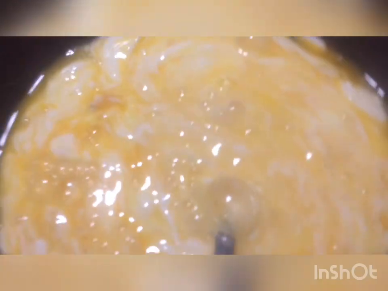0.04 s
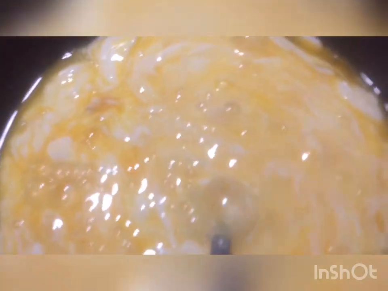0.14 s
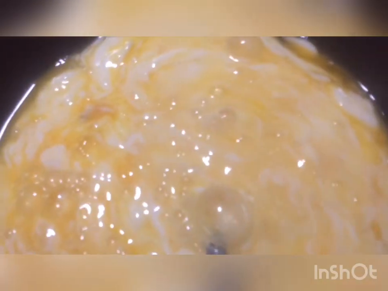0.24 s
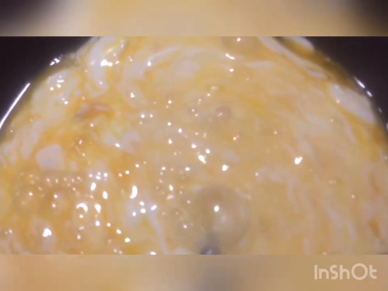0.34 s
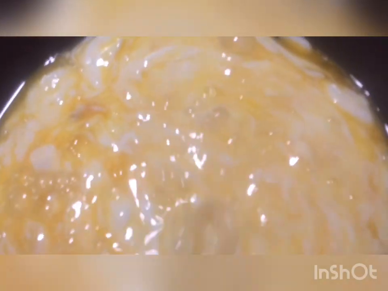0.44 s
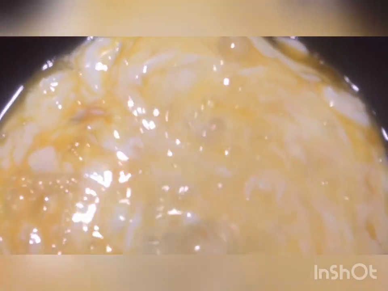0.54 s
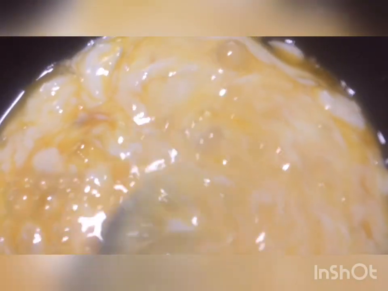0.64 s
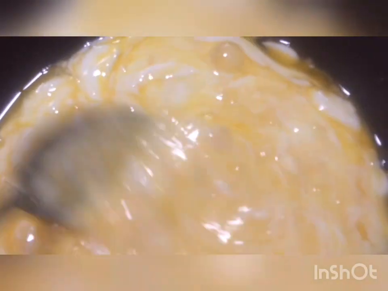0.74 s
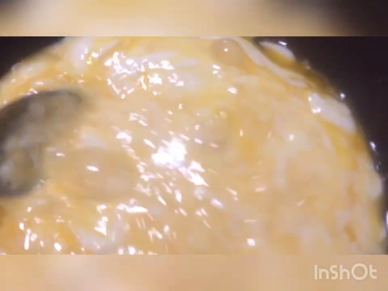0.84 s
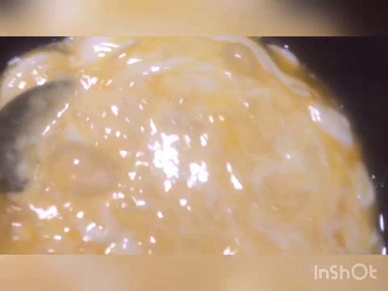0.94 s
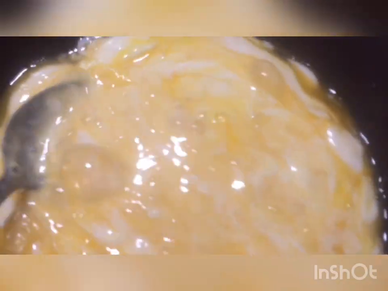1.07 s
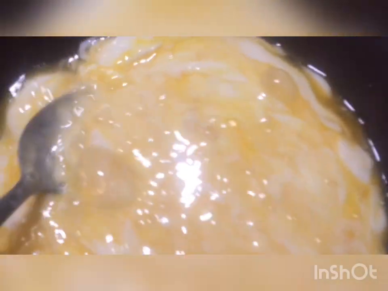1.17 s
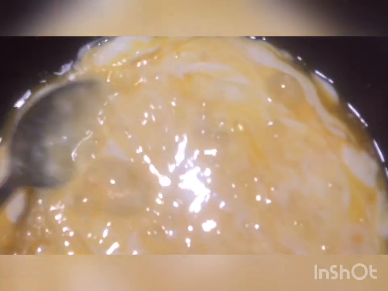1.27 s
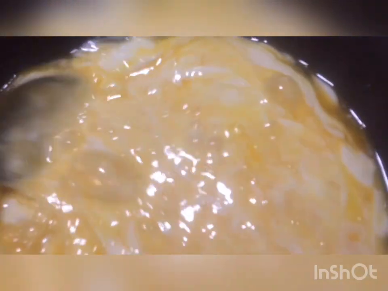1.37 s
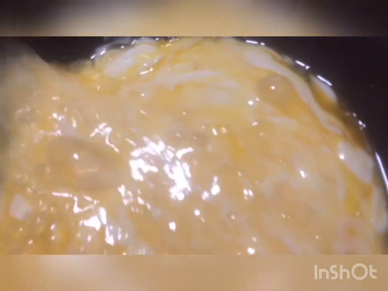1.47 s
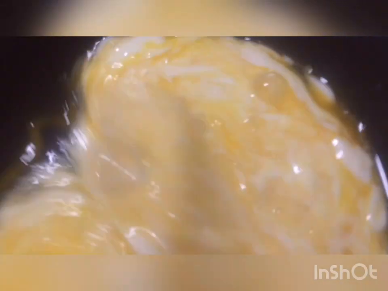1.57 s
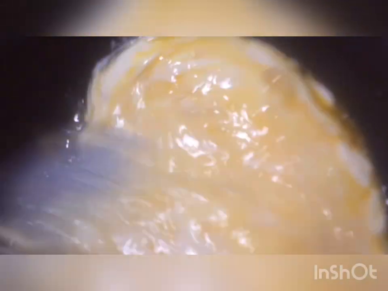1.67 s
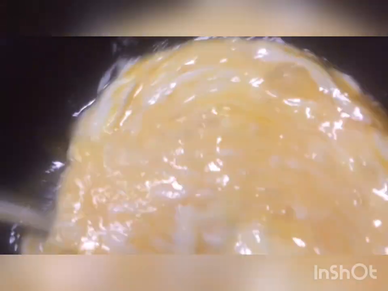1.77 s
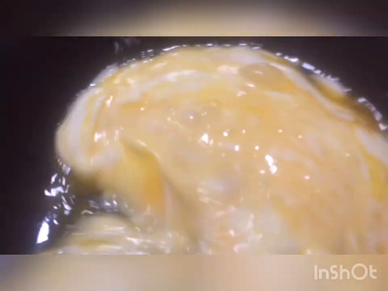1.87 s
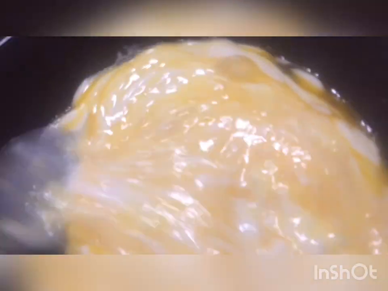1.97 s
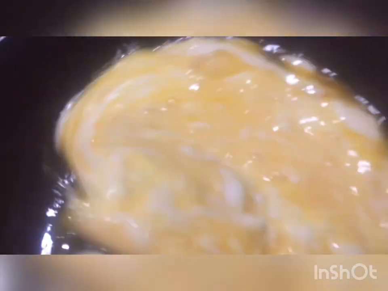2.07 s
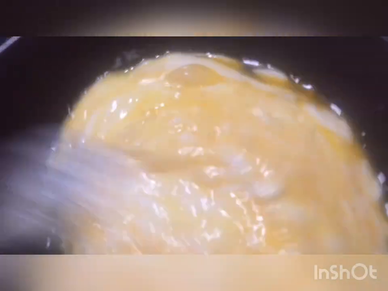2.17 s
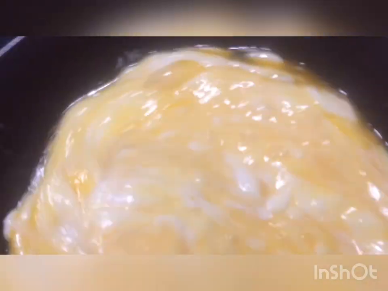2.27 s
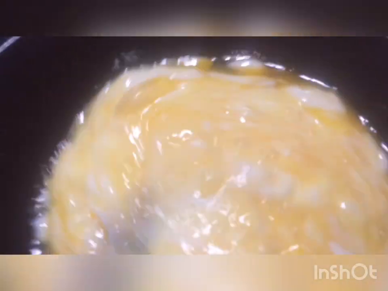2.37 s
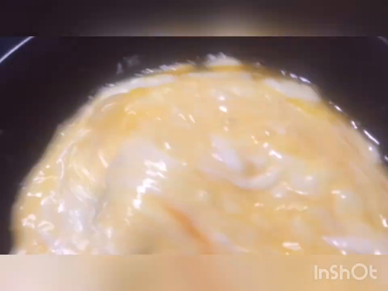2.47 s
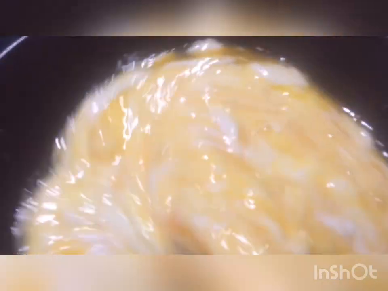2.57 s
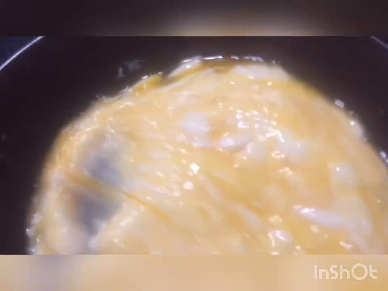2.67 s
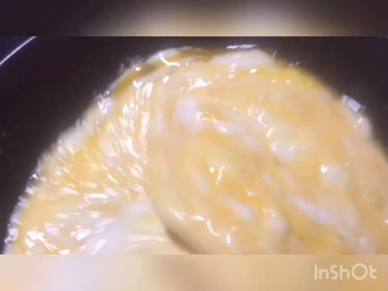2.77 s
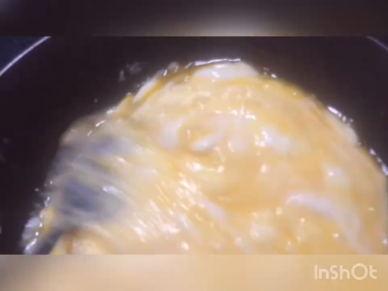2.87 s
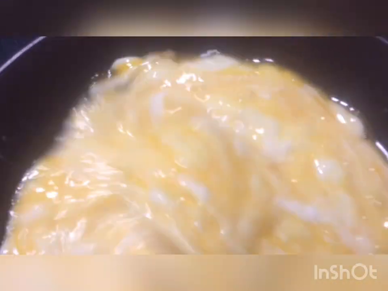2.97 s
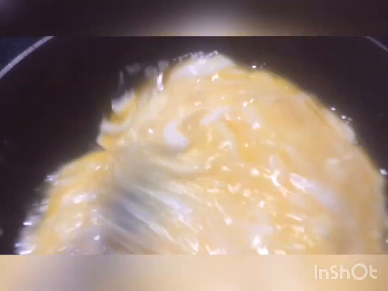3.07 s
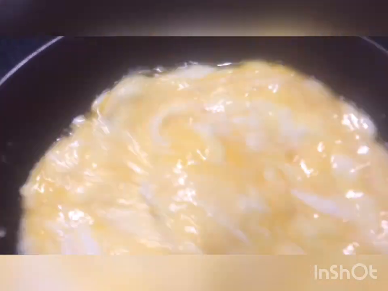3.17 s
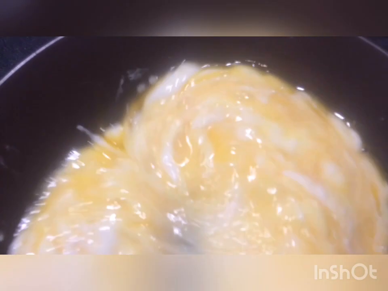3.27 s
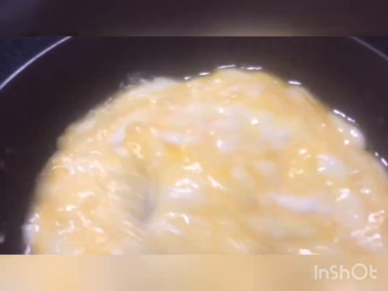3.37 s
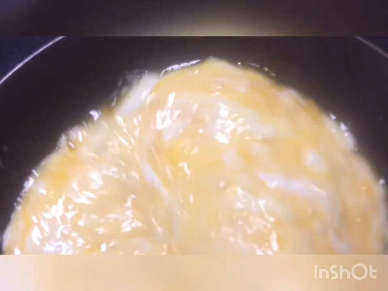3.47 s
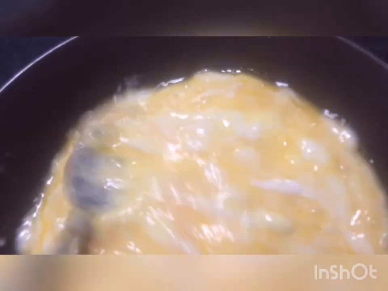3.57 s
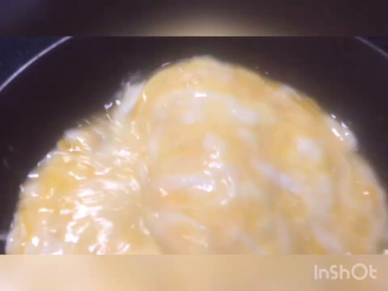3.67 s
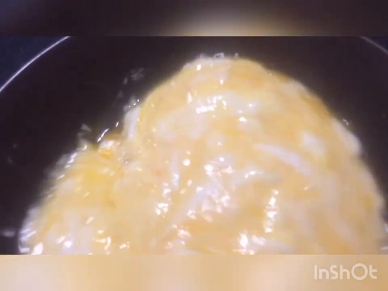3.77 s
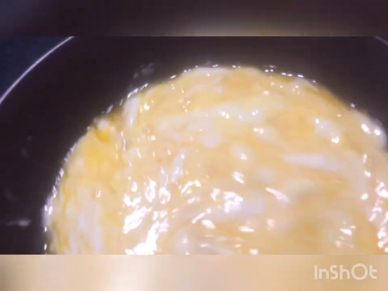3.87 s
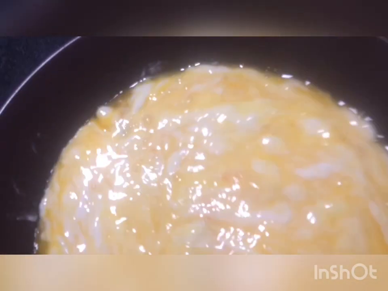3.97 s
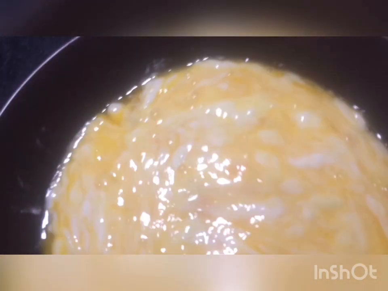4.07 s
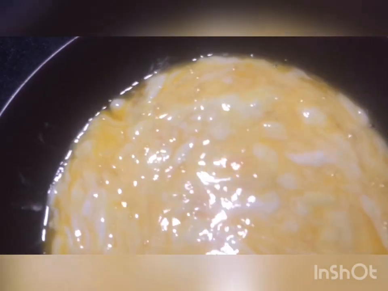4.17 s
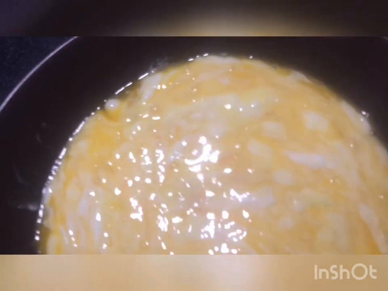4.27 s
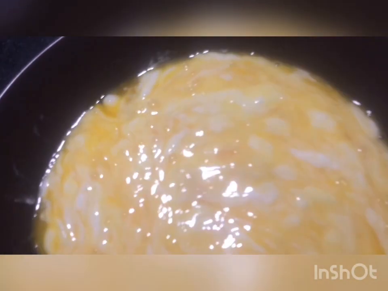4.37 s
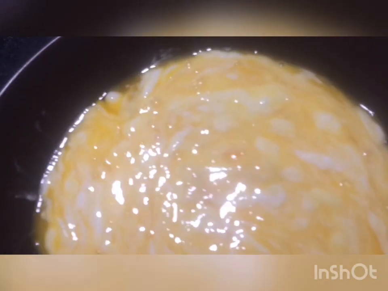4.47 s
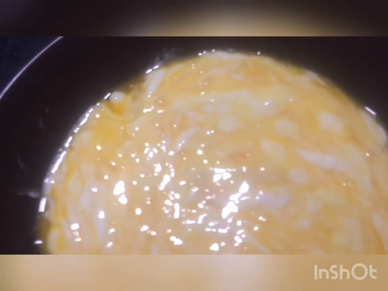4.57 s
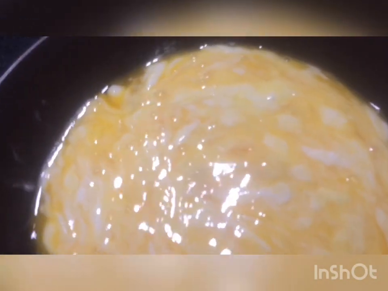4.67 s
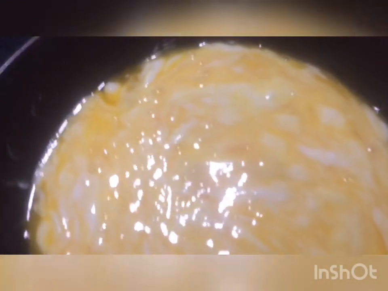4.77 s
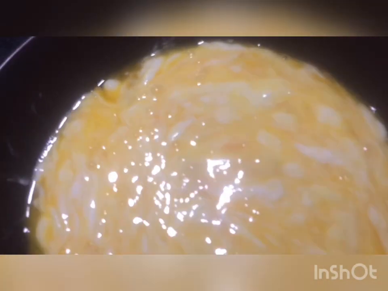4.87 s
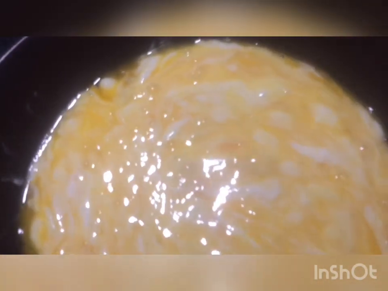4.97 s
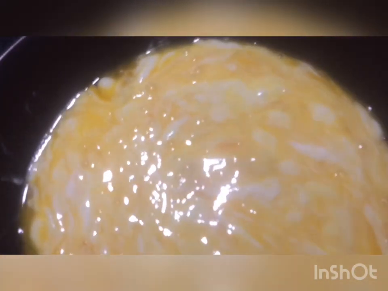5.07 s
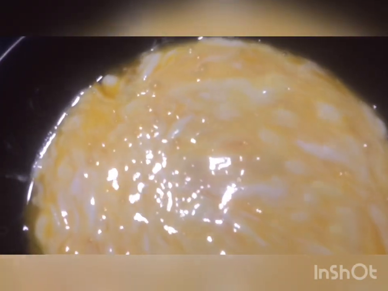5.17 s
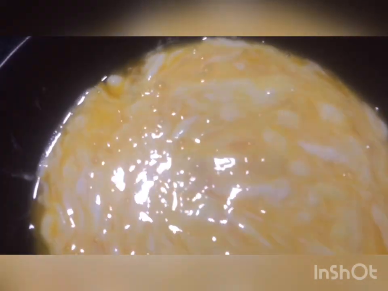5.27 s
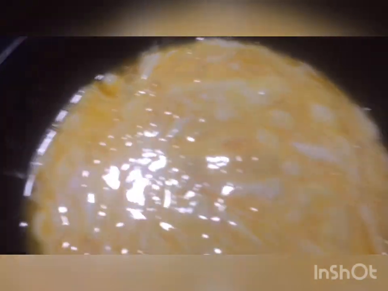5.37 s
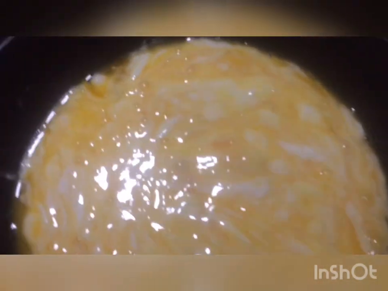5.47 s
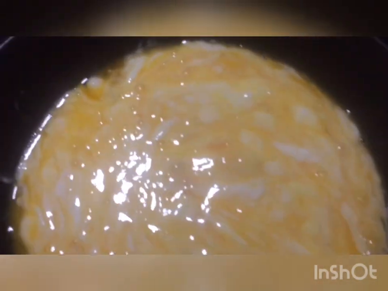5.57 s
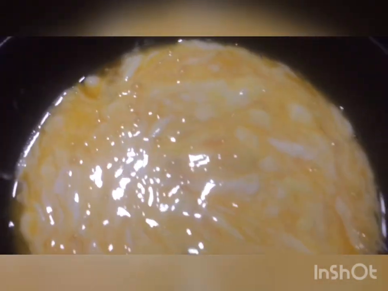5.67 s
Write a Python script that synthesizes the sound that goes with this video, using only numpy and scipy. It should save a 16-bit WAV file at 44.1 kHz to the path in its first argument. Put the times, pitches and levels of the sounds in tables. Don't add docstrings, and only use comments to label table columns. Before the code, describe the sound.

A few soft scraping strokes on a pan floor lead into about two seconds of rapid egg beating, each stroke a clink and gritty scrape with gloopy pops and slaps. The spoon is let go and clatters brightly on the counter; after a quiet second the pan is put down. Close microphone, short kitchen echo, light hiss.

```python
import sys
import numpy as np
from scipy import signal
from scipy.fft import rfft, irfft, next_fast_len
from scipy.io import wavfile

SR = 44100
rng = np.random.default_rng(int(sys.argv[2]) if len(sys.argv) > 2 else 0)


def nominal_scale(level):
    x = np.asarray(level, float) / 20
    return 10 ** x


def persist_wave(psi):
    counts = np.round(np.clip(psi, -1, 1) * 32767).astype(np.int16)
    wavfile.write(sys.argv[1], SR, np.atleast_2d(counts).T)


N = 253134
BEATING = round(4.1 * SR)

# [f/Hz, level/dB per Hz]
AIR_SPECTRUM = [(15, -38), (25, -18), (53, -5.5), (127, -8.5), (161, -4), (217, -18), (354, -2),
                (439, -19.5), (624, -15.5), (677, -20), (1480, -8), (2840, -27.5), (4250, -20.5),
                (10400, -31), (16000, -60)]
# [t/s, level/dB]
AIR_LEVEL = [(0, -61), (1.5, -59), (4.101, -59), (4.42, -62), (4.701, -60), (5.74, -59.5)]
# [f/Hz, width/Hz, level/dB]
CASING = [(142, 28, 1.5), (378, 41, -6.5), (586, 13, -9), (1320, 2.6, 8.5), (1542, 21, 2.5),
          (2060, 100, -17), (2350, 64, -13), (3560, 140, -12.5), (4030, 89, -13), (7140, 200, -17.5),
          (8600, 62, -25.5), (10000, 54, -28)]
# [f/Hz, width/Hz, level/dB]
MOTOR = [(158, 3.8, -69.5), (646, 6.6, -71.5)]
KITCHEN_T60_S, KITCHEN_DB, WALL_CUT_HZ = 0.33, -28.5, 8200

# [t/s, level/dB]
SET_DOWN = [
    (5.722, -51.5),
    (5.727, -45.5),
    (5.7325, -19.5),
    (5.7345, -24.5),
    (5.7375, -13.5),
    (5.7393, -22),
]
# [f/Hz, level/dB, t60/s]
PAN_BASE = [(149.3, -20.5, 0.0225), (345, -5, 0.11), (551, -2.5, 0.099), (936, -6.5, 0.05),
            (1390, -4, 0.041), (2040, -2, 0.053), (2790, -12.5, 0.091), (3300, -4, 0.014),
            (4000, -11.5, 0.031), (5200, -6, 0.0047)]
BASE_SOFT_HZ = 5050
# [t/s, peak level/dB]
BUMPS = [
    (0.398, -40),
    (5.133, -40),
]

# [t/s, peak level/dB, worktop thud level/dB, crack level/dB, bowl level/dB]
DROP = [
    (3.912, -38.5, -60.5, -57, -39),
    (4.1385, -44.5, -54.5, -50, -38.5),
    (4.1612, 1.5, -16.5, -8, 7),
    (4.171, -17, -18.5, -44, -16),
    (4.1943, -3.5, -26, -12, -2),
    (4.2131, -24, -32, -27.5, -22.5),
    (4.2211, -13, -22, -12, -14),
    (4.2276, -9, -42, -25.5, -20),
    (4.2394, -31, -52, -31, -17),
]
# [f/Hz, level/dB, t60/s]
SPOON = [(690, -19, .25), (1000, -16, .17), (1408, -18, .14), (2046, -11, .17), (2390, -23, .15),
         (2915, -8, .28), (3682, -24, .1), (3962, 0, .12), (3945, -25, .55), (4350, -6, .03),
         (4630, -4, .025), (5157, -29, .28), (6520, -25, .33), (6800, -6, .025), (7200, -8, .02),
         (8030, -18, .17), (9760, -27, .14), (10600, -14, .025), (11400, -33, .13), (12400, -17, .025),
         (13300, -35, .1), (15600, -20, .03)]
# [low f/Hz, high f/Hz]
SPOON_BOWL_HZ = (3800, 4100)
# [f/Hz, level/dB per Hz]
WORKTOP = [(35, -46), (60, -26), (180, -6), (676, -2.5), (1580, -10.5), (2090, -10.5), (2550, -29),
           (3000, -1.5), (3900, -28), (6600, -120)]
# [f/Hz, level/dB, t60/s]
WORKTOP_MODES = [(169, -10, 0.085), (313.7, -16.5, 0.37), (453, -9.5, 0.24), (849.6, -10.5, 0.156),
                 (1290, -12.5, .2), (1750, -3.5, .03), (2260, -3.5, 0.0364)]
BRIGHT_HZ, BRIGHT_DB = 4200, 12
SPOON_RESTS_S, REST_T60_S, ROCK_HZ, ROCK_DB = 4.41, .12, 14, 3

FROTH_START_S, FROTH_RISE_S, FROTH_END_S, FROTH_DB, FROTH_SETTLE_DB = 1.9, .2, 1.9, -49.5, 15
# [peak t/s, level/dB, f/Hz, half length/s, climb per ms]
BUBBLE = (3.4225, -21, 3800, 0.0028, 0.02)
# [peak t/s, peak level/dB, centre f/Hz]
SPLATS = [
    (2.6975, -20, 3960),
    (2.9135, -16.5, 3500),
    (2.3, -28, 3200),
    (7.4, -26, 5200),
]
SPLAT_RISE_S, SPLAT_FALL_S = 0.0023, 0.0044
# [t/s, peak level/dB, f/Hz]
DROPLETS = [(0.2713, -40, 9100), (1.8093, -13, 6430), (1.8146, -9, 7470), (2.002, -23, 1900),
            (2.0022, -17, 4830), (2.4794, -11.5, 4810), (2.72, -24, 3400), (2.745, -24, 5620),
            (2.9125, -20, 2360), (2.937, -14.5, 7100), (2.9634, -14.5, 4520), (2.9837, -19.5, 3560),
            (3.0185, -13, 2350), (3.1445, -13, 5200), (3.1704, -11, 3020), (3.182, -13, 2180),
            (3.345, -7, 2480), (3.4135, -28, 4500), (3.6276, -37, 3750), (4.5068, -44, 6860),
            (5.715, -31, 3680)]
# [t/s, peak level/dB, f/Hz]
FILMS = [(0.606, -33.5, 8100), (0.646, -46, 3070), (0.828, -41, 7200), (1.799, -9.5, 3180),
         (2.041, -39, 3730), (2.0777, -9, 6800), (2.2544, -12, 5300), (2.2802, -8.5, 2670),
         (2.4846, -17, 6540), (2.5146, -32, 4970), (2.5285, -12, 6200), (2.6974, -5, 4850),
         (2.769, -30, 8600), (3.1568, -15.5, 6300), (3.2095, -29, 4130), (3.231, -19, 2620),
         (3.3611, -14, 4500), (3.4, -24, 5440), (3.399, -23, 3500), (3.632, -45, 7800), (2.559, -40, 10500),
         (3.181, -25, 7000), (3.496, -22, 3150), (3.702, -32, 3860), (3.86, -31, 8100), (1.595, -40, 2970)]
DROPLET_SPRAY_DB, FILM_SPRAY_DB, FILM_TONE_DB = -28.5, -6, -9
# [t/s, peak level/dB, f/Hz, slap level/dB, climb as share of pitch]
PLOPS = [(1.765, -26, 1320, -38, 0.046), (1.794, -23.5, 900, -21, 0.61), (2.018, -17.5, 707, -5.5, 0.087),
         (2.255, -33.5, 1290, -47.5, 0.16), (2.28, -23, 1050, -3, 0.081), (2.512, -26, 600, -34, 0.063),
         (2.575, -34.5, 800, -62, 0.086), (2.587, -18, 818, -40, 0.048), (2.695, -29, 755, -23, 0.14),
         (2.911, -33.5, 683, -30, 0.098), (2.936, -23.5, 1320, -18, 0.11), (3.019, -12, 1380, -8, 0.045),
         (3.152, -15, 1068, -11, 0.23), (3.187, -18, 1390, -21, 0.094), (3.345, -23.5, 620, -26, 0.031),
         (3.501, -21, 733, -5, 0.1), (3.568, -19.5, 943, -7, 0.16), (3.436, -43, 1480, -60, 0.091),
         (3.639, -13, 1157, -48, 0.2), (3.732, -23.5, 721, -4, 0.052)]
# [f/Hz, level/dB, t60/s]
WET_PAN = [(771, -6.5, 0.062), (1290, 0, 0.047), (1900, -12, 0.11)]
PLOP_CYCLES, PLOP_PAN_DB = 27.5, -19.5

# [t/s, loudest ring f/Hz, pan modes level/dB, bright crack level/dB, weight level/dB]
KNOCKS = [(0.958, 2540, -9.5, -19.5, -15), (1.618, 2960, -2.5, -13.5, 2.5), (1.836, 2860, -45, -11.5, -4.5),
          (1.881, 3840, -45.5, -12.5, -6), (2.113, 5500, -16, -15, -0.5), (2.315, 6370, -49, -9, 11.5),
          (2.359, 7000, -15.5, -12.5, 6), (2.585, 3360, -13, -15, -5.5), (2.802, 3540, -10.5, -17.5, -8),
          (3.034, 3700, -8.5, -19, -22.5), (3.265, 3190, -9.5, -17.5, -25), (3.5, 2990, -18, -25, -28),
          (3.566, 2850, -22.5, -30, -40), (3.73, 3490, -20, -25.5, -18)]
THUMPS_DB = [-43, -31, -34, -35.5, -31.5, -34, -30, -31, -28, -30, -37, -38.5, -47, -33.5]
THUDS_DB = [-34, -17, -25, -28.5, -33, -19.5, -32, -40.5, -35.5, -40.5, -37, -43, -45, -44]
FLOOR_SPOT_HZ = [1800, 1800, 1800, 1750, 1930, 1800, 2000, 1870, 1950, 1750, 1800, 1800, 1800, 1800]
KNOCK_RING_DB = [8, 2, -6, -2, -9.5, -5.5, -3, -4, 1.5, 0.5, -7, 2, -6, -2.5]
WALL_TONE_DB = [1, 2.5, 7, -0.5, -5, -4.5, -16.5, 1.5, -6, 3, 0, 0, 0, -2]
# [f/Hz, width/Hz, level/dB]
PAN = [(1306, 99, 6), (1800, 170, 4), (2530, 31, 0), (3200, 84, -18.5), (3840, 48, -16), (4360, 210, -10.5),
       (6210, 450, -5), (7540, 85, -15), (8460, 81, -22.5), (8630, 69, -30.5), (9380, 97, -15.5),
       (10600, 110, -17.5)]
# [f/Hz, level/dB, t60/s]
PAN_HUM = [(1300, -21.5, 0.53), (673, -19.5, 0.15), (1820, -23.5, 0.039), (337, -22.5, 0.093),
           (174, -21, 0.11), (452, -15, 0.053)]
# [f/Hz, level/dB, t60/s]
SPOON_RING = [(2960, -19, 0.25), (4000, -23, 0.13), (5100, -14.5, 0.11), (6600, -21.5, 0.11),
              (7740, -26, 0.051), (9900, -21, 0.073)]
THUMP_T60_S, THUD_T60_S = 0.016, 0.099
GLANCING_DB = -28
WALL_COATED_S, WALL_COATED_DB, COATED_RING_SHARE = 2.0, -8, .4

# [start t/s, contact t/s, level/dB, body level/dB, squeak f/Hz]
STROKES = [(1.63, 0.047, -16.5, -8, 1826), (1.848, 0.063, -37.5, -10.5, 1440), (1.889, 0.04, -24, -8, 1988),
           (2.121, 0.053, -21.5, -9, 1750), (2.323, 0.04, -37, -4, 1400), (2.367, 0.045, -20, -7, 2080),
           (2.596, 0.049, -24, -0.5, 1856), (2.811, 0.06, -23.5, -3.5, 1900),
           (3.042, 0.05, -20.5, -6, 1800), (3.273, 0.069, -27, -2.5, 1900), (3.507, 0.03, -38, 9.5, 1676),
           (3.547, 0.021, -32.5, 5.5, 1490)]
BITE_DB = [0.5, 4, 0.5, -0.5, 2.5, -6.5, -2.5, 0, -4, 9.5, 8, 3]
# [from f/Hz, to f/Hz]
WHISTLE_HZ = [(4000, 7500), (6000, 6000), (9000, 7000), (5500, 7200), (5000, 5000), (5500, 8000),
              (6500, 9200), (8000, 5300), (5000, 7200), (6200, 5000), (5000, 5000), (5000, 5000)]
WHISTLE_DB = [-10.5, -14, -17, -6, -11.5, 0, -0.5, -2, -3, -6.5, -7, -5]
# [t/s, pressure level/dB, speed as brightness level/dB, squeak f/Hz]
DRAGS = [
    [(0.44, -49, 1, 1753), (0.462, -27, -0.5, 1740), (0.495, -32.5, 10.5, 1738), (0.56, -42.5, 12, 1718)],
    [(0.625, -52, -1, 1800), (0.665, -46, -12, 1750), (0.68, -37.5, -10, 1460), (0.705, -49.5, -10, 1440)],
    [(0.962, -24.5, 3, 1352), (0.992, -36, -3, 1300), (1.05, -34, -12.5, 1900), (1.09, -37, -9.5, 1250),
     (1.17, -35, -14.5, 1220), (1.2, -40, -1, 1500), (1.25, -36.5, -4, 1600), (1.275, -37.5, -9, 1590),
     (1.3, -55.5, -2, 1590)],
    [(1.352, -39.5, -12.5, 1695), (1.375, -28, -5.5, 1700), (1.41, -33, 7, 1900),
     (1.447, -33.5, -1.5, 1460)],
    [(3.74, -30.5, -3.5, 1555), (3.8, -43, 6, 1800), (3.812, -39.5, -8.5, 1900), (3.89, -52.5, -11.5, 1773),
     (3.895, -60, -6, 1900)],
]
DRAG_WET_DB = [8, 3.5, 1.5, -10, 4.5]
# [f/Hz, level/dB per Hz]
SCRAPE = [(120, -51), (200, -39), (754, -32), (1340, 11), (1490, -56), (1970, 15.5), (2370, -2),
          (3240, 7.5), (4110, 0.5), (7020, 2.5), (12900, -13.5), (15500, -29.5), (16400, -47)]
REGISTERS_HZ = [900, 2800, 6800]
# [f/Hz, width/Hz, level/dB]
SPOON_DRAG = [(450, 40, -10), (720, 60, -10), (1160, 45, -4), (1730, 85, 0), (2770, 130, -7),
              (3190, 66, -9), (3320, 40, -11), (3880, 170, -9), (4670, 140, -14), (5370, 80, -4),
              (6270, 100, -11), (6570, 45, -10), (8040, 90, -20), (9760, 180, -21)]
# [f/Hz, width/Hz, level/dB]
FIRST_SWISH = [(600, 19, -11.5), (874, 11, -6.5), (1140, 48, 2.5), (1740, 72, -8.5), (2220, 66, -2),
               (2820, 59, -5.5), (3305, 19, -1.5), (3930, 200, -8.5), (5350, 54, -4), (6640, 28, -9.5),
               (7780, 36, -8), (9660, 430, -21.5), (11600, 79, -26), (13400, 54, -34)]
# [f/Hz, width/Hz, level/dB]
LONG_DRAG = [(441, 20, -6), (800, 41, -17.5), (1250, 100, -1.5), (1610, 90, 2.5), (2000, 190, -2.5),
             (2170, 59, -5), (2500, 120, -1), (3150, 130, -12.5), (4000, 150, -20.5), (4500, 47, -28),
             (5350, 42, -17), (6000, 160, -20.5), (7060, 170, -19), (8550, 120, -25)]
# [f/Hz, width/Hz, level/dB]
LAST_SWISH = [(1700, 43, -2), (1900, 46, -2), (2400, 47, -10), (2676, 55, -2), (3190, 95, -1.5),
              (3750, 83, -7), (4130, 49, -8), (5100, 62, -6.5), (6200, 220, -7), (6500, 57, -13.5),
              (7000, 25, -14.5), (8550, 110, -19), (9000, 58, -21.5), (13300, 66, -31)]
SLOSH_DB, SLOSH_FADE_DB, SLOSH_FOLLOWS = -37, 14.5, 0.34
BODY_SWELL_DB, LEVEL_SWELL_DB, HISS_DB, HISS_SWELL_DB, FASTEST = 7.5, -1, -7, 7, 0.78
LIFT_DB, SQUEAK_CLIMB = -4.5, .1
SLACK_DB, SLACK_AT = -3, .4
DRAG_SLOSH_DB, DRAG_SLOSH_FOLLOWS, DRAG_SLOSH_SPEED = -52.5, 0.67, .35
DRAG_HISS_DB, DRAG_HISS_FOLLOWS = -12, 1
SLOW_SING_DB, FAST_SING_DB = 4.5, -8
SLOW_SQUEAK_DB, FAST_SQUEAK_DB = -2, -7.5

CLICK = np.eye(1, SR // 2)[0]


def rms_one(x):
    return x / np.sqrt(np.mean(x ** 2) + 1e-20)


def at_hz(points, hz):
    return np.interp(np.log(hz), np.log(np.array(points)[:, 0]), np.array(points)[:, 1])


def drift(rate, count):
    r = np.exp(-32 * np.pi * rate / SR)
    white = rng.standard_normal((count, BEATING // 16 + 500))
    slow = signal.lfilter([1], [1, -2 * r, r * r], white)[:, 499:]
    return [np.interp(np.arange(BEATING) / 16, np.arange(len(row)), rms_one(row)) for row in slow]


def ring(clicks, hz, t60):
    r = nominal_scale(-60 / (t60 * SR))
    w = 2 * np.pi * hz / SR
    return signal.lfilter([0, np.sin(w)], [1, -2 * r * np.cos(w), r * r], clicks + 1e-18)


def resonance(x, hz, width_hz):
    r = np.exp(-np.pi * width_hz / SR)
    feedback = [1, -2 * r * np.cos(2 * np.pi * hz / SR), r * r]
    return signal.lfilter(np.array([1, 0, -1]) * (1 - r * r) / 2, feedback, x)


def band(x, low_hz, high_hz):
    return signal.sosfilt(signal.butter(2, [low_hz, min(high_hz, SR / 2.2)], "band", fs=SR, output="sos"), x)


def coloured(white, spectrum):
    hz = np.maximum(np.arange(len(white) // 2 + 1) * SR / len(white), 1)
    return rms_one(irfft(rfft(white) * nominal_scale(at_hz(spectrum, hz)), len(white)))


def add(out, s, sound):
    i = round(s * SR)
    out[i:i + len(sound)] += sound[:N - i]


def burst(noise, t60, low_hz, high_hz):
    x = band(noise * nominal_scale(-60 * np.arange(len(noise)) / SR / t60), low_hz, high_hz)
    return x / np.max(np.abs(x))


def background():
    white = rng.standard_normal((2, N))
    hum = rms_one(sum(nominal_scale(db) * resonance(white[1], hz, width_hz) for hz, width_hz, db in CASING))
    level_db = np.interp(np.arange(N) / SR, *np.transpose(AIR_LEVEL))
    tones = 0
    for hz, width_hz, db in MOTOR:
        tones = tones + nominal_scale(db) * rms_one(resonance(resonance(white[1], hz, width_hz), hz, 30))
    air = nominal_scale(level_db) * (coloured(white[0], AIR_SPECTRUM) + nominal_scale(-2.0) * hum) + tones
    return signal.sosfilt(signal.butter(6, 13000, fs=SR, output="sos"), air)


def kitchen(x):
    size = next_fast_len(N + SR)
    w = 2 * np.pi * np.arange(size // 2 + 1) / size
    dull = 1 / (1 + 1j * w * SR / (2 * np.pi * WALL_CUT_HZ))
    echoes = 0
    for k, lag in enumerate(rng.uniform(0.003, .035, size=14)):
        loop = nominal_scale(-60 * lag / KITCHEN_T60_S) * dull * np.exp(-1j * w * round(lag * SR))
        echoes = echoes + (-1) ** k * loop / (1 - loop)
    return irfft(rfft(x, size) * echoes, size)[:N]


def bumps():
    out = np.zeros(N)
    for s, peak_db in BUMPS:
        add(out, s, nominal_scale(peak_db) * burst(rng.standard_normal(5000), 0.044, 61, 600))
    return out


def set_down():
    out = np.zeros(N)
    touch = signal.sosfilt(signal.butter(2, BASE_SOFT_HZ, fs=SR, output="sos"), CLICK)
    for s, blow_db in SET_DOWN:
        for k, (hz, db, t60) in enumerate(PAN_BASE):
            add(out, s, nominal_scale(blow_db + db) * (-1) ** k * ring(touch, hz, t60))
    add(out, SET_DOWN[-1][0], nominal_scale(-26.5) * burst(rng.standard_normal(400), 0.0095, 5000, 15000))
    return out


def spoon_drop():
    out = np.zeros(N)
    dying = nominal_scale(-60 * np.arange(len(CLICK)) / SR / 0.26)
    for s, peak_db, thud_db, crack_db, bowl_db in DROP:
        luck = rng.normal(0, 1.2, len(SPOON))
        for k, (hz, db, t60) in enumerate(SPOON):
            twin_hz = (.996 - .0015 * luck[k - 1]) * hz
            pair = ring(CLICK, hz, t60) + .55 * ring(CLICK, twin_hz, .8 * t60)
            blow_db = bowl_db if SPOON_BOWL_HZ[0] < hz < SPOON_BOWL_HZ[1] else peak_db
            if hz >= BRIGHT_HZ:
                blow_db = crack_db + BRIGHT_DB
            add(out, s, nominal_scale(blow_db - 15.5 + db + luck[k]) * (-1) ** k * pair)
        add(out, s, nominal_scale(thud_db - 8.5) * dying * coloured(rng.standard_normal(len(CLICK)), WORKTOP))
        for k, (hz, db, t60) in enumerate(WORKTOP_MODES):
            add(out, s, nominal_scale(thud_db - 0.5 + db + luck[k]) * (-1) ** k * ring(CLICK, hz, t60))
        add(out, s, nominal_scale(crack_db + 3.5) * burst(rng.standard_normal(2000), 0.011, 2900, 8200))
        add(out, s, nominal_scale(crack_db - 7.0) * burst(rng.standard_normal(12000), 0.11, 2200, 7000))
    t = np.arange(N) / SR
    rocking_db = ROCK_DB * np.sin(2 * np.pi * ROCK_HZ * t) * (t > DROP[-1][0])
    return out * nominal_scale(rocking_db - 60 * np.maximum(t - SPOON_RESTS_S, 0) / REST_T60_S)


def froth():
    sizes = nominal_scale(3.0 * np.minimum(rng.exponential(1, N), 4)) * rng.choice([-1, 1], N)
    clicks = sizes * (rng.random(N) < 5000 / SR)
    dealt = rng.integers(0, 6, N)
    pitches = np.geomspace(2500, 10000, 6)
    fizz = sum(resonance(clicks * (dealt == k), hz, .25 * hz) for k, hz in enumerate(pitches))
    s = [FROTH_START_S, FROTH_START_S + FROTH_RISE_S, FROTH_END_S]
    level_db = [FROTH_DB - FROTH_SETTLE_DB, FROTH_DB, FROTH_DB - FROTH_SETTLE_DB]
    return nominal_scale(np.interp(np.arange(N) / SR, s, level_db, left=-120, right=-120)) * rms_one(fizz)


def bubble():
    out, t = np.zeros(N), np.arange(-500, 2500) / SR
    s, peak_db, hz, half_s, climb = BUBBLE
    phase = 2 * np.pi * np.cumsum(hz * (1 + climb * 1000 * np.clip(t, -half_s, half_s))) / SR
    shape = np.exp(-(t / half_s) ** 2) + nominal_scale(-22 - 60 * t / .09) * (t > 0)
    add(out, s + t[0], nominal_scale(peak_db) * shape * np.sin(phase))
    return out


def splats():
    out, t = np.zeros(N), np.arange(-400, 1200) / SR
    shape = np.exp(np.where(t < 0, t / SPLAT_RISE_S, -t / SPLAT_FALL_S))
    for s, peak_db, hz in SPLATS:
        wet = band(rng.standard_normal(len(t)), 0.72 * hz, 1.9 * hz) * shape
        add(out, s + t[0], nominal_scale(peak_db) * wet / np.max(np.abs(wet)))
    return out


def spatter():
    out, t = np.zeros(N), np.arange(2000) / SR
    snaps = [(*row, 0, DROPLET_SPRAY_DB) for row in DROPLETS]
    snaps += [(*row, FILM_TONE_DB, FILM_SPRAY_DB) for row in FILMS]
    for s, peak_db, hz, tone_db, spray_db in snaps:
        noise = rng.standard_normal(len(t))
        tone = np.sin(2 * np.pi * hz * t * (.97 + 5 * np.minimum(t, .008)))
        blip = tone * nominal_scale(tone_db - 60 * t / .016) * (1 - np.exp(-t / .0015))
        add(out, s, nominal_scale(peak_db - 6) * (blip + .4 * burst(noise, .009, .8 * hz, 1.3 * hz)))
        add(out, s, nominal_scale(peak_db + spray_db) * burst(noise, .007, .8 * hz, 1.4 * hz + 1500))
    return out


def plops():
    out, t = np.zeros(N), np.arange(5000) / SR
    for s, peak_db, hz, slap_db, climb in PLOPS:
        t60 = PLOP_CYCLES / hz
        s += .001
        noise = rng.standard_normal(len(t))
        tone = np.sin(2 * np.pi * hz * t * (1.0 + climb * np.minimum(t / t60, 1)))
        tone *= nominal_scale(-60 * t / t60) * (1 - np.exp(-t / 0.0011))
        add(out, s, nominal_scale(peak_db + 3.5) * tone)
        add(out, s, nominal_scale(peak_db - 3.5) * burst(noise, 1.9 * t60, 0.76 * hz, 1.39 * hz))
        for pan_hz, db, ring_s in WET_PAN:
            add(out, s, nominal_scale(peak_db + PLOP_PAN_DB + db) * ring(CLICK[:len(t)], pan_hz, ring_s))
        add(out, s, nominal_scale(slap_db - 10.5) * burst(noise, 0.0056, 2100, 3400))
    return out


def wall_hum(s, weight_db, tone_db, luck):
    coated = s > WALL_COATED_S
    hum = 0
    for k, (hz, db, t60) in enumerate(PAN_HUM):
        level_db = weight_db - 13.0 + WALL_COATED_DB * coated + db + luck[k]
        if k == 0:
            level_db += tone_db
            t60 *= COATED_RING_SHARE if coated else 1
        hum = hum + nominal_scale(level_db) * ring(CLICK, hz, t60)
    return band(hum, 140, 4000)


def knocks():
    out = np.zeros(N)
    per_knock = zip(KNOCKS, THUMPS_DB, THUDS_DB, FLOOR_SPOT_HZ, KNOCK_RING_DB, WALL_TONE_DB)
    for row, thump_db, thud_db, spot_hz, ring_db, tone_db in per_knock:
        s, hz, pan_db, crack_db, weight_db = row
        s += .001
        luck, noise = rng.normal(0, 1, 24), rng.standard_normal(4000)
        contact = CLICK[:4000] + 0.2 * noise * nominal_scale(-60 * np.arange(4000) / SR / 0.019)
        body = nominal_scale(crack_db + ring_db) * ring(contact, hz, 0.024)
        for k, (mode_hz, width_hz, db) in enumerate(PAN):
            blow_db = pan_db - 8.5 if mode_hz < 2800 else crack_db + 3.0
            mode_hz = spot_hz if k == 1 else mode_hz
            mode = ring(contact, mode_hz * (1 + 0.008 * luck[k + 12]), 2.6 / max(width_hz, 110))
            body += nominal_scale(blow_db + db + 2 * luck[k]) * (-1) ** k * mode
        add(out, s, band(body, 900, 13000))
        add(out, s, nominal_scale(crack_db + 8) * burst(noise, .0025, 2000, 12500))
        add(out, s, nominal_scale(crack_db - 3.0) * burst(noise, 0.054, 3000, 11000))
        add(out, s, nominal_scale(thump_db) * burst(noise[::-1], THUMP_T60_S, 50, 300))
        add(out, s + 0.0024, nominal_scale(thud_db) * burst(np.roll(noise, 2000), THUD_T60_S, 250, 1400))
        if pan_db < GLANCING_DB:
            for k, (mode_hz, db, t60) in enumerate(SPOON_RING):
                add(out, s, nominal_scale(crack_db + db + 1.5 * luck[k]) * ring(CLICK, mode_hz, t60))
        add(out, s, wall_hum(s, weight_db, tone_db, luck[6:]))
    return out


def stroke_shape(start_s, contact_s, level_db, body_db, squeak_hz, bite_db):
    part = np.array([0, np.clip(SLACK_AT, .1, .5), np.clip(FASTEST, .55, .95), 1])
    speed = np.minimum(part / part[2], 1)
    scrape_db = level_db + LEVEL_SWELL_DB * speed + np.array([bite_db, SLACK_DB, 0, LIFT_DB])
    slosh_db = SLOSH_DB + SLOSH_FOLLOWS * (level_db + 26.5) - SLOSH_FADE_DB * speed
    low_db = scrape_db + body_db + BODY_SWELL_DB * (speed - .5)
    hiss_db = scrape_db + HISS_DB + HISS_SWELL_DB * speed
    levels_db = [slosh_db, low_db, scrape_db, hiss_db]
    return start_s + contact_s * part, levels_db, squeak_hz * (1 - SQUEAK_CLIMB * (1 - speed))


def drag_shape(rows, wet_db):
    s, pressure_db, speed_db, squeak_hz = np.transpose(rows)
    slosh_db = DRAG_SLOSH_DB + wet_db + DRAG_SLOSH_FOLLOWS * (pressure_db + 34.0) + DRAG_SLOSH_SPEED * speed_db
    hiss_db = pressure_db + DRAG_HISS_DB + DRAG_HISS_FOLLOWS * speed_db
    return s, [slosh_db, pressure_db, pressure_db + speed_db, hiss_db], squeak_hz


def singing(modes, grit, swell, crowd):
    sung = 1e-3 * crowd
    for k, (hz, width_hz, db) in enumerate(modes):
        mode = resonance(resonance(grit[k % 2], hz, width_hz), hz, 10.0 * width_hz)
        sung[np.searchsorted(REGISTERS_HZ, hz)] += nominal_scale(db + 2.6 * swell[2 * k]) * mode
    return sung / sung.std(axis=1, keepdims=True)


def glide(grit, s, span, hz, width_hz):
    turn = np.exp(2j * np.pi * np.cumsum(np.interp(span / SR, s, hz)) / SR)
    chatter = signal.lfilter([1], [1, -np.exp(-np.pi * width_hz / SR)], grit[0] + 1j * grit[1])
    return rms_one((turn * chatter).real)


def pan_crowd(grit, swell):
    crowd = np.zeros((4, BEATING)) + 1e-9 * grit[0]
    for k, hz in enumerate(np.geomspace(220, 15500, 40)):
        mode = resonance(resonance(grit[k % 2], hz, 0.11 * hz), hz, 0.3 * hz)
        crowd[np.searchsorted(REGISTERS_HZ, hz)] += nominal_scale(at_hz(SCRAPE, hz) + 3.2 * swell[k]) * mode
    return crowd


def scrapes():
    grit = rng.standard_normal((2, BEATING)) * nominal_scale(1.7 * np.array(drift(130, count=2)))
    swell = np.array(drift(24, count=40))
    crowd = pan_crowd(grit, swell)
    drag_voices = [FIRST_SWISH, LONG_DRAG, LONG_DRAG, LAST_SWISH, SPOON_DRAG]
    moves = []
    for k, (modes, rows, wet_db) in enumerate(zip(drag_voices, DRAGS, DRAG_WET_DB)):
        moves.append((modes, k == 4, None, drag_shape(rows, wet_db)))
    for row, bite_db, whistle_hz, whistle_db in zip(STROKES, BITE_DB, WHISTLE_HZ, WHISTLE_DB):
        moves.append((SPOON_DRAG, True, (whistle_hz, whistle_db), stroke_shape(*row, bite_db)))
    out = np.zeros(N)
    for modes, fast, whistle, (s, levels_db, squeak_hz) in moves:
        span = np.arange(round(s[0] * SR), round((s[-1] + 0.2) * SR))
        t = span / SR
        after = np.maximum(t - s[-1], 0)
        lift = nominal_scale(-60 * after / .03) + nominal_scale(-22.5 - 60 * after / 0.4)
        edge = np.minimum(1, (span - span[0]) / (0.0017 * SR)) * lift
        sing_db = FAST_SING_DB if fast else SLOW_SING_DB
        squeak_db = FAST_SQUEAK_DB if fast else SLOW_SQUEAK_DB
        sung = singing(modes, grit[:, span], swell[:, span], crowd[:, span])
        squeak = band(glide(grit[:, span], s, span, squeak_hz, 70), 1000, 2700)
        out[span] += edge * nominal_scale(np.interp(t, s, levels_db[1]) + squeak_db) * squeak
        if whistle:
            whistle_hz, whistle_db = whistle
            gap = band(glide(grit[:, span], s[[0, -1]], span, whistle_hz, 800), 3000, 11000)
            out[span] += edge * nominal_scale(np.interp(t, s, levels_db[2]) + whistle_db) * gap
        for k, level_db in enumerate(levels_db):
            mix = crowd[k][span] / crowd[k].std() + nominal_scale(sing_db) * sung[k]
            mix = mix / np.hypot(1, nominal_scale(sing_db))
            out[span] += edge * nominal_scale(np.interp(t, s, level_db) - 2.5) * mix
    return out


def scene():
    air = background()
    near = bumps() + set_down() + spoon_drop() + froth() + spatter() + plops() + knocks() + scrapes()
    room = nominal_scale(KITCHEN_DB) * kitchen(near)
    return (band(near + splats() + bubble() + room, 79, 12000) + air)[None]


def band_limit(x):
    return signal.sosfilt(signal.butter(12, 16550, fs=SR, output="sos"), x)


def record(dry):
    rounded = 1.512 * np.tanh(dry / 1.504)
    mix = signal.sosfilt(signal.cheby2(10, 40, 16600, fs=SR, output="sos"), rounded)
    return band_limit(mix)


dry = scene()
out = record(dry)
persist_wave(out)
```